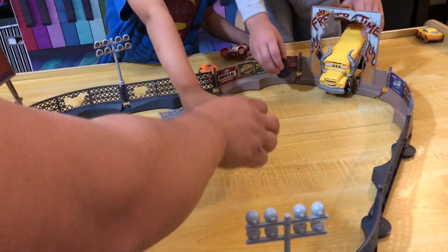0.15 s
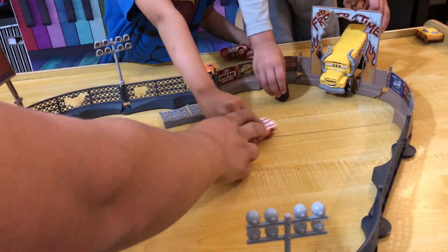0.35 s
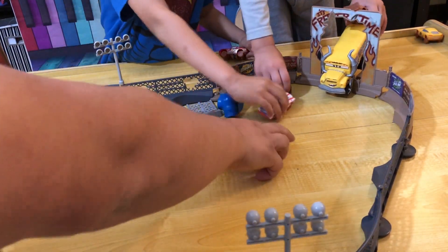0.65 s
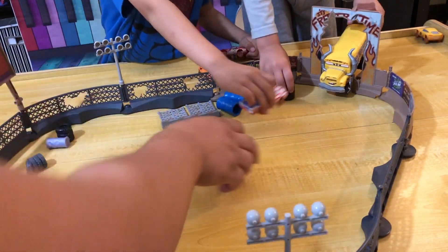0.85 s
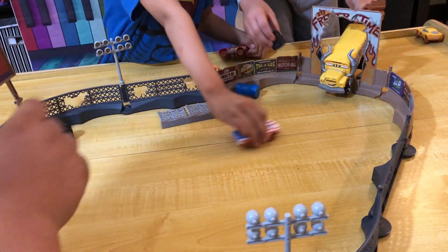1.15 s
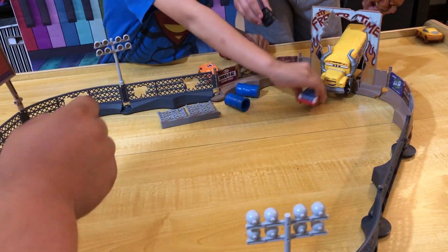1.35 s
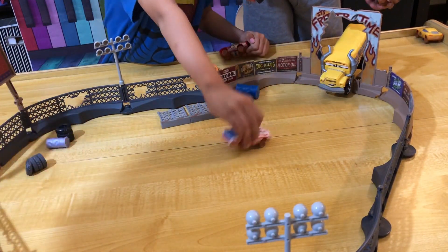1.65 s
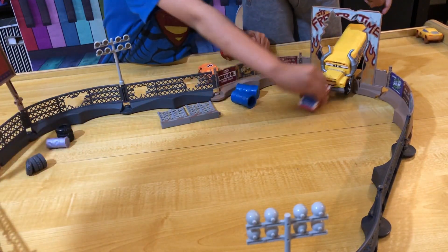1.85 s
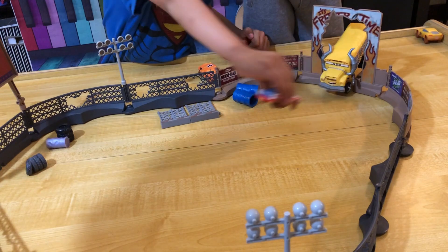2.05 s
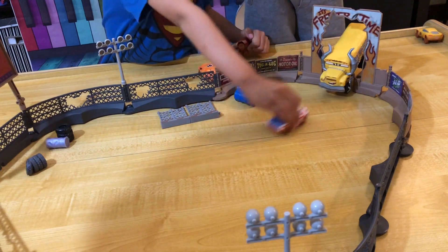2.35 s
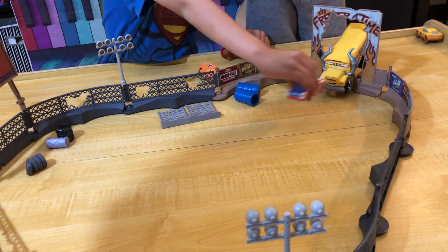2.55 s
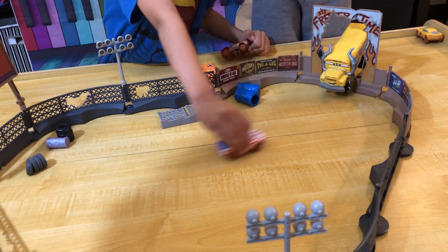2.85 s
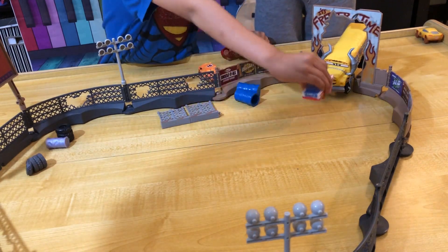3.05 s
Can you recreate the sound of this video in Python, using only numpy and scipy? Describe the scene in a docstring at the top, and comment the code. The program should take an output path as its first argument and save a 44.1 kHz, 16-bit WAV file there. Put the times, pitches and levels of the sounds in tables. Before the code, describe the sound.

Toy cars clack sharply against plastic track walls and each other, thumping a wooden table. After about a second, one car is swiped back and forth, its wheels whirring between further knocks. Heard close by in a small room.

```python
"""At a wooden table in a small room, toy cars are pushed by hand into plastic track walls and each other.
Each knock is a short crack with a brief plastic ring, and the table top thumps under many of them.
The wheels of one car, swiped again and again over the wood, keep whirring; loose axles click, and
a hollow wall piece rings once. The room echoes the knocks and clicks; loud peaks are rounded off."""
import sys
import numpy as np
from scipy import signal
from scipy.fft import rfft, irfft, next_fast_len
from scipy.io import wavfile
from scipy.ndimage import uniform_filter1d, map_coordinates

SR = 44100
rng = np.random.default_rng(int(sys.argv[2]) if len(sys.argv) > 2 else 0)


def persist_wave(psi):
    """Save psi, clipped to +-1, as 16-bit WAV."""
    counts = np.round(np.clip(psi, -1, 1) * 32767).astype(np.int16)
    wavfile.write(sys.argv[1], SR, np.atleast_2d(counts).T)


N = 141120  # 3.2 seconds


def amp(db):
    return 10 ** (np.asarray(db) / 20)


def unit(x):
    """Scale x to an average power of 1."""
    return x / np.sqrt(np.mean(x ** 2) + 1e-20)


def along(points, hz):
    """Read between (Hz, value) points on a log pitch scale."""
    pitches, values = np.transpose(points)
    return np.interp(np.log(hz + 1), np.log(pitches + 1), values)


def curves(rows):
    """Turn timed rows into one curve per column; a late table reads -120 until it starts."""
    times, *columns = np.transpose(rows)
    t = np.arange(N) / SR
    return [np.interp(t, times, c, left=-120 if times[0] > .1 else c[0]) for c in columns]


def wobble(rate):
    """A smooth curve through `rate` random values a second."""
    return map_coordinates(rng.standard_normal(int(N * rate / SR) + 4), [np.arange(N) * rate / SR])


def filtered(x, response):
    """Scale each frequency in x by response(Hz)."""
    n = x.shape[-1]
    size = next_fast_len(n + 8192)
    return irfft(rfft(x, size) * response(np.fft.rfftfreq(size, 1 / SR)), size)[..., :n]


def coloured(x, colour):
    """Give x the tone colour of (Hz, dB) points, at power 1."""
    return unit(filtered(x, lambda f: amp(along(colour, f))))


def resonances(peaks, f):
    """How strongly (Hz, width, dB) resonances answer at frequencies f."""
    return sum((-1) ** k * amp(db) * 1j * f * width / (hz * hz - f * f + 1j * f * width)
               for k, (hz, width, db) in enumerate(peaks))


def band(x, hz, sharpness):
    """Keep the part of x near one pitch, at power 1."""
    return unit(filtered(x, lambda f: resonances([(hz, hz / sharpness, 0)], f) ** 2))


def wavering(x, hz, width_hz):
    """Pass x through a resonance whose pitch drifts and whose strength flickers, at power 1."""
    turn = np.exp(2j * np.pi * np.cumsum(hz * (1 + .015 * wobble(7.22))) / SR)
    down = x / turn  # slide the pitch to 0 Hz, filter there, then slide back
    real, imag = filtered(np.array([down.real, down.imag]), lambda f: 1 / (1 + 1j * f / width_hz) ** 2)
    return unit(((real + 1j * imag) * turn).real * amp(2.2 * wobble(12)))


def grit(jolts_per_s=1200, spread_db=4.5):
    """Many tiny jolts of uneven size on top of smooth noise."""
    happens = rng.random(N) < jolts_per_s / SR
    size = amp(spread_db * np.clip(rng.standard_normal(N), -2, 2))
    jolts = happens * size * np.sign(rng.standard_normal(N))
    return unit(jolts) + amp(-1) * rng.standard_normal(N)


# The colour of the room's hush. Each row: frequency in Hz, level in dB.
AIR_COLOUR = [(20, -26), (70, 0.5), (1000, -15.5), (16000, -33.5)]
def air():
    """The quiet, steady noise of the room."""
    return amp(-54) * coloured(rng.standard_normal(N), AIR_COLOUR)


# The room's echo. Each row: frequency in Hz, fade time (to fall by 60 dB) in seconds.
ECHO_FADES = [(300, 0.42), (1500, 0.43), (5000, 0.46), (14000, 0.26)]
def room_echo(x):
    """The room stores the energy of each band and gives it back as fading noise."""
    hz, t, spectrum = signal.stft(x, SR, nperseg=256)
    energy = uniform_filter1d(np.abs(spectrum) ** 2, size=3, axis=0)  # neighbouring bands share
    kept_per_step = amp(-60 * t[1] / along(ECHO_FADES, hz)) ** 2
    stored = np.array([signal.lfilter([0, 0, 1 - k], [1, -k], e) for k, e in zip(kept_per_step, energy)])
    noise = signal.stft(rng.standard_normal(N), SR, nperseg=256)[2]
    noise /= np.sqrt(np.mean(np.abs(noise) ** 2))
    return signal.istft(noise * np.sqrt(np.abs(stored)), SR, nperseg=256)[1][:N]


# The table top's own notes. Each row: pitch in Hz, level in dB, fade time in seconds.
WOOD_NOTES = [(119.6, -2.5, 0.2), (148.3, -0.5, 0.23), (177.7, -4, 0.19), (225.8, -0.5, 0.21),
              (277.5, 5, 0.1), (321.3, -2.5, 0.24), (346.6, -1.5, 0.19), (417, -1, 0.2), (517.4, -6, 0.29),
              (731, -8, 0.33), (876, -8, 0.35)]
# Shifting on the table. Each row: time in seconds, rumble level in dB, scuffle level in dB.
SHIFTS = [(0, -51, -44.5), (.35, -38.5, -42.5), (.6, -33, -39.5), (.815, -51, -42.5), (.835, -29.5, -41),
          (1.15, -47.5, -44), (1.35, -38.5, -50), (1.5, -59.5, -51), (2.0, -78, -43), (2.12, -61, -50.5),
          (3.2, -53, -49)]
# The scuffle's colour. Each row: frequency in Hz, level in dB.
SCUFFLE_COLOUR = [(290, -52), (600, -34), (880, 9), (2260, 11), (2890, 5), (7980, -6.5), (16000, -63)]
def handling():
    """Hands and cars shift about, making a lumpy rumble in the wood and a dull scuffle."""
    rumble_db, scuffle_db = curves(SHIFTS)
    peaks = [(hz, 30 + 0.079 * hz, db) for hz, db, _ in WOOD_NOTES]
    rumble = filtered(rng.standard_normal(N), lambda f: resonances(peaks, f) * f**2 / (f**2 + 90**2))
    rumble = unit(rumble) * amp(rumble_db + 4 * wobble(25.16))
    scuffle = filtered(grit(), lambda f: amp(along(SCUFFLE_COLOUR, f)) * (f > 450))
    return rumble + unit(scuffle) * amp(scuffle_db + 2.5 * wobble(30.7))


# One long ring: start in seconds, level in dB, pitch in Hz, width in Hz, fade time in seconds.
WALL_RING = (1.955, -25, 900, 70, .42)
def hollow_wall():
    """A hollow wall piece rings on with a rough, narrow tone."""
    start, db, hz, width_hz, fade_s = WALL_RING
    t = np.arange(N) / SR - start
    return (t > 0) * amp(db - 60 * np.abs(t) / fade_s) * wavering(rng.standard_normal(N), hz, width_hz)


# Axle clicks. Each row: start in seconds, level in dB, pitch in Hz.
CLICKS = [(.047, -33, 5800), (0.074, -29, 5500), (.366, -26, 6460), (.615, -22, 7400), (.943, -27.5, 9000),
          (1.643, -26.5, 9500), (2.09, -24.5, 12500), (2.143, -26, 12500), (2.17, -25, 11500),
          (2.248, -26, 11500), (2.588, -27, 11000), (2.663, -30, 11000), (2.715, -23.5, 10400),
          (3.174, -27, 11000)]
def axle_clicks(fade_s=.008):
    """Loose axles and wheels make tiny, bright clicks."""
    out, t = np.zeros(N + SR), np.arange(SR // 40) / SR
    for start, db, hz in CLICKS:
        click = band(rng.standard_normal(len(t)), hz, sharpness=1.5)
        out[round(start * SR):][:len(t)] += amp(db - 60 * t / fade_s) * click
    return out[:N]


# The swiped car. Each row: time in seconds, main whirr in dB, its pitch in Hz,
# middle hiss in dB, top hiss in dB, low whirr in dB, its pitch in Hz.
SWIPES = [(1.17, -51, 3970, -46, -62, -65, 1200), (1.29, -32, 3960, -29.5, -27.5, -31.5, 1320),
          (1.4, -29, 3650, -33, -32.5, -38.5, 1600), (1.56, -33.5, 3660, -34.5, -40.5, -42, 1700),
          (1.68, -32, 3830, -38, -40.5, -44.5, 1670), (1.86, -27.5, 3600, -28, -31.5, -36, 1730),
          (2.03, -35, 3490, -37.5, -33.5, -44, 1740), (2.17, -28, 3850, -32, -41, -51, 1750),
          (2.33, -32.5, 3830, -33, -34, -41.5, 1620), (2.5, -32.5, 3400, -39.5, -38.5, -43, 1690),
          (2.65, -37.5, 3680, -40, -46, -50, 1640), (2.77, -34, 3860, -39, -45, -50.5, 1610),
          (2.87, -43, 3730, -36, -43, -49, 1580), (3.02, -27.5, 3580, -32.5, -30.5, -36, 1590),
          (3.2, -37, 3800, -42.5, -44, -52, 1590)]
# The car's middle and top resonances. Each row: pitch in Hz, width in Hz, level in dB.
MIDDLE_PEAKS = [(3100, 300, -9), (4650, 350, -3), (5600, 300, 0), (6450, 300, -1)]
TOP_PEAKS = [(7780, 300, 0), (8950, 400, -4)]
# The wheel rattle's colour. Each row: frequency in Hz, level in dB.
RATTLE_COLOUR = [(8000, -32), (9800, 0), (16000, -5.5)]
def wheels():
    """Spinning wheels shake the car's small resonances and rattle above them."""
    main_db, main_hz, middle_db, top_db, low_db, low_hz = curves(SWIPES)
    bumps = amp(0.87 * wobble(40) + 1.42 * wobble(130))
    shaking = grit() * bumps

    def hiss(peaks):
        return unit(sum((-1) ** k * amp(db) * wavering(shaking, hz, width)
                        for k, (hz, width, db) in enumerate(peaks)))

    main = wavering(grit() * bumps, main_hz * (1 + .008 * wobble(30)), width_hz=327)
    rattle = coloured(shaking * amp(1.2 * wobble(90)), RATTLE_COLOUR)
    low = wavering(shaking, low_hz, width_hz=140)
    middle = hiss(MIDDLE_PEAKS) + amp(-7.5) * rattle
    top = hiss(TOP_PEAKS)
    return amp(main_db) * main + amp(low_db) * low + amp(middle_db) * middle + amp(top_db) * top


# Thumps in the wood. Each row: start in seconds, level in dB, centre pitch in Hz.
TABLE_THUMPS = [(.017, -32.5, 198), (0.126, -21.5, 228), (0.377, -20, 245), (.468, -19, 200),
                (.515, -19.5, 162), (0.687, -20.5, 154), (0.72, -26.5, 108), (0.92, -19.5, 196),
                (1.065, -27.5, 149), (1.163, -13.5, 216), (1.275, -23, 155), (1.754, -9.5, 168),
                (1.83, -19.5, 209), (1.952, -21.5, 113), (2.356, -10.5, 226), (2.372, -8.5, 215),
                (2.885, -14, 216), (2.896, -18.5, 208), (2.975, -15.5, 170)]
def table_thumps(rise_s=0.0081, drop_db_per_octave=7):
    """Struck or pressed, the table top rings its notes, a little differently each time."""
    out, t = np.zeros(N + SR), np.arange(SR // 2) / SR
    for start, db, centre_hz in TABLE_THUMPS:
        chance = rng.standard_normal((2, len(WOOD_NOTES)))
        wood = np.zeros(len(t))
        for (hz, note_db, fade_s), extra_db, detune in zip(WOOD_NOTES, *chance):
            level_db = note_db + extra_db - drop_db_per_octave * abs(np.log2(hz / centre_hz))
            wood += amp(level_db - 60 * t / fade_s) * np.sin(2 * np.pi * hz * (1 + 0.0245 * detune) * t)
        out[round(start * SR):][:len(t)] += amp(db) * (1 - np.exp(-t / rise_s)) * wood
    return out[:N] * amp(2 * wobble(70))  # a fast flutter roughens the sound


# The colours of a knock's broad clack and bright crack. Each row: frequency in Hz, level in dB.
CLACK_COLOUR = [(400, -17.5), (700, -8), (1600, -7), (5000, -17.5), (9000, -49), (16000, -79)]
CRACK_COLOUR = [(1500, -17), (3500, 0.5), (6000, 4), (9000, -4), (12000, -13.5), (16000, -18)]
# Cars hitting things. Each row: start in seconds, relative level in dB, ring pitch in Hz,
# crack level over the ring in dB, fade time in seconds.
CAR_KNOCKS = [(0.016, -20, 1640, -7, 0.044), (0.126, -6.5, 1430, 1, 0.017), (0.154, -1, 1380, -8.5, 0.026),
              (0.232, -18, 1580, -9.5, 0.04), (0.376, 3.5, 1760, 1, 0.027), (0.468, -4, 3780, 5, 0.018),
              (0.474, -5, 1830, -1, 0.032), (0.485, -11, 6940, 6, 0.031), (0.506, -20.5, 5700, 17, 0.016),
              (0.522, -14, 1250, -2, 0.048), (0.592, -12.5, 1070, 1, 0.034), (0.623, -16, 1340, -20, 0.056),
              (0.682, -2, 1520, -6, 0.022), (0.733, -10.5, 1670, -6, 0.032), (0.83, -25.5, 1265, -33, 0.17),
              (0.91, -2.5, 3900, -1.5, 0.019), (0.923, -1, 1430, -25, 0.025),
              (0.956, -10, 1490, -20, 0.052), (1.082, -18, 830, -6, 0.022), (1.163, 2, 1610, -0.5, 0.04),
              (1.177, 1.5, 1640, -1, 0.013), (1.277, -13, 1070, -3, 0.065), (1.581, -33, 2200, 6, 0.1),
              (1.753, 4, 1597, 1, 0.034), (1.7683, 1.5, 3450, -4.5, 0.022), (1.945, -3, 7700, 8, 0.039),
              (1.956, -4.5, 2790, 0, 0.055), (1.964, -2, 935, -1, 0.034), (2.357, 0, 4800, -4, 0.021),
              (2.366, -3, 3460, 4, 0.088), (2.384, -4.5, 5350, -9, 0.061), (2.501, -15, 3000, 8.5, 0.035),
              (2.885, 1, 1550, -0.5, 0.027), (2.896, -3, 5480, 3.5, 0.039), (2.916, -7.5, 1570, -2, 0.047),
              (2.96, -14, 1630, 9, 0.049), (2.972, -5.5, 1620, 4, 0.047), (3.006, -7, 3400, 1, 0.022)]
def car_knocks():
    """A car hits a wall or another car: plastic rings, clacks and cracks, then quickly dies away."""
    out, t = np.zeros(N + SR), np.arange(SR // 8) / SR
    for start, db, hz, crack_db, fade_s in CAR_KNOCKS:
        noise = rng.standard_normal((3, len(t)))
        rise = 1 - np.exp(-t / (0.03 * fade_s))
        fall_db = -60 * t / fade_s
        rough_ring = band(noise[0], hz, sharpness=5)
        clean_ring = amp(-4.5 + 1.3 * fall_db) * np.sin(2 * np.pi * hz * t)
        clack = amp(1.5) * coloured(noise[1], CLACK_COLOUR)
        crack = amp(crack_db + fall_db / 0.93) * coloured(noise[2], CRACK_COLOUR)
        hit = (rough_ring + clean_ring + clack) * amp(fall_db) + crack
        out[round(start * SR):][:len(t)] += amp(db - 8.5) * rise * hit
    return out[:N]


def scene():
    """Add all the sounds into one channel; only knocks and clicks get an echo."""
    hits = car_knocks() + axle_clicks()
    echo = amp(-6.5) * room_echo(hits)
    return (hits + echo + hollow_wall() + table_thumps() + wheels() + handling() + air())[None]


def record(dry, low_cut_hz=90, top_hz=15800):
    """Round off the loudest peaks, then cut the deep bass and the highest treble."""
    rounded = dry / (1 + np.abs(dry) ** 6) ** (1 / 6)
    return filtered(rounded, lambda hz: (hz < top_hz) * (1j * hz / (low_cut_hz + 1j * hz)))


dry = scene()
out = record(dry)
persist_wave(out)
```